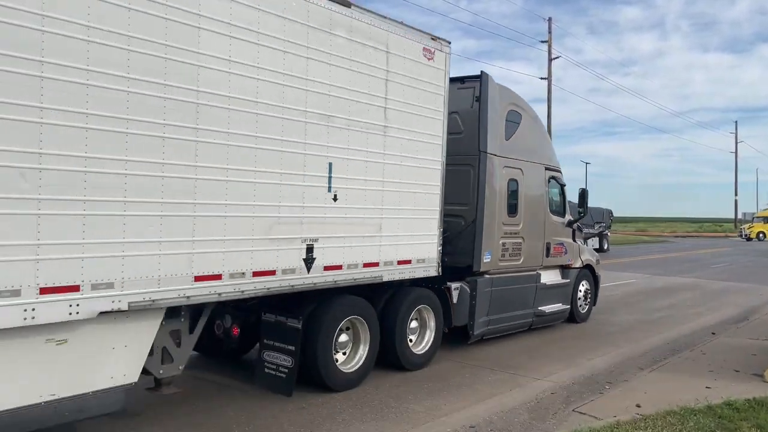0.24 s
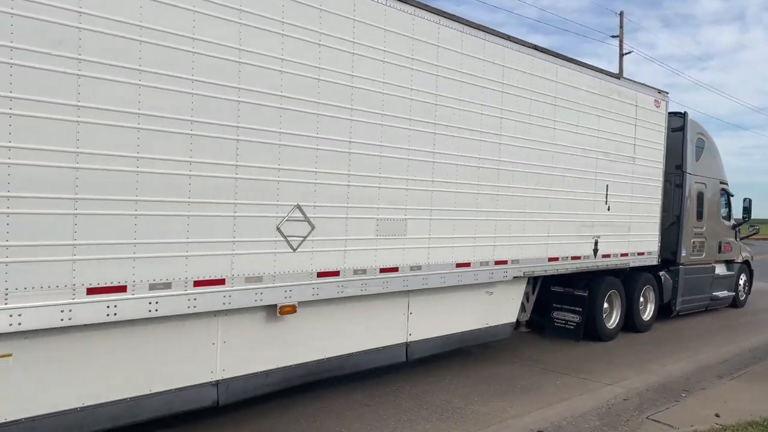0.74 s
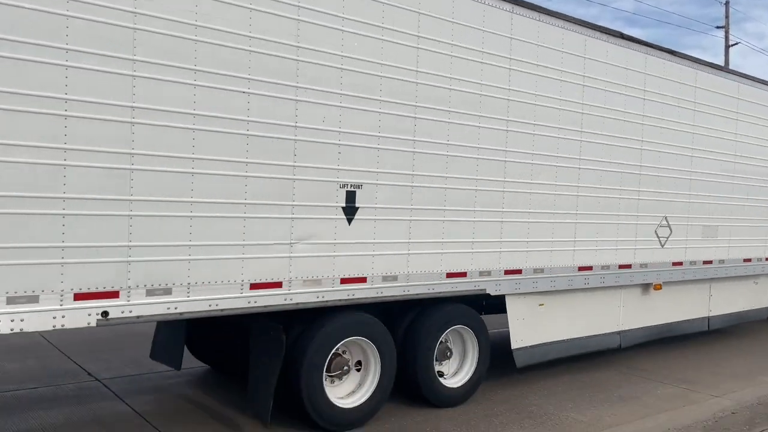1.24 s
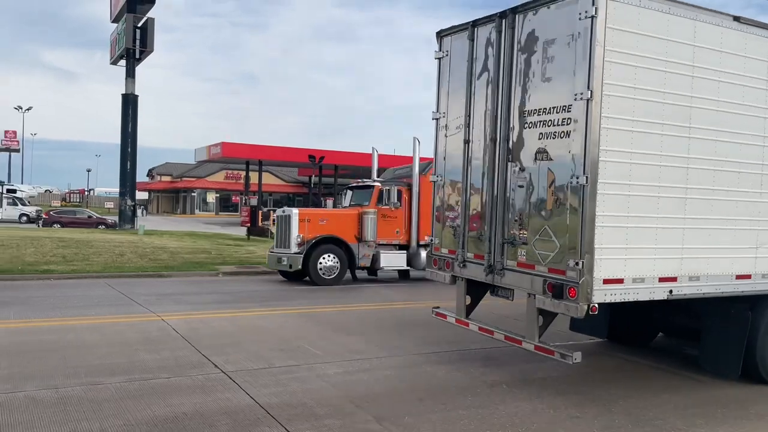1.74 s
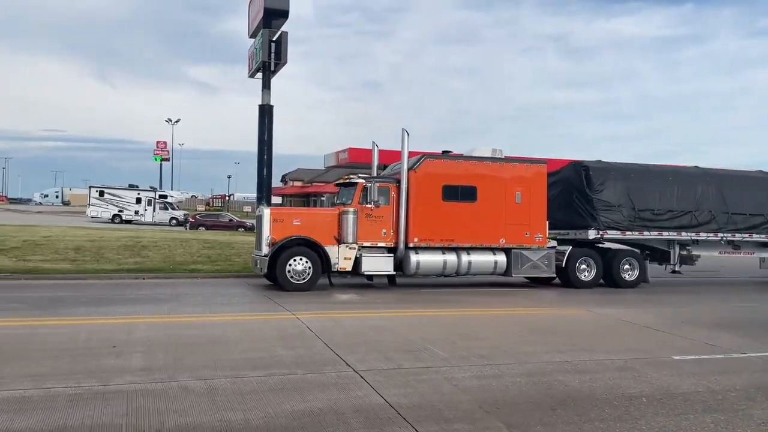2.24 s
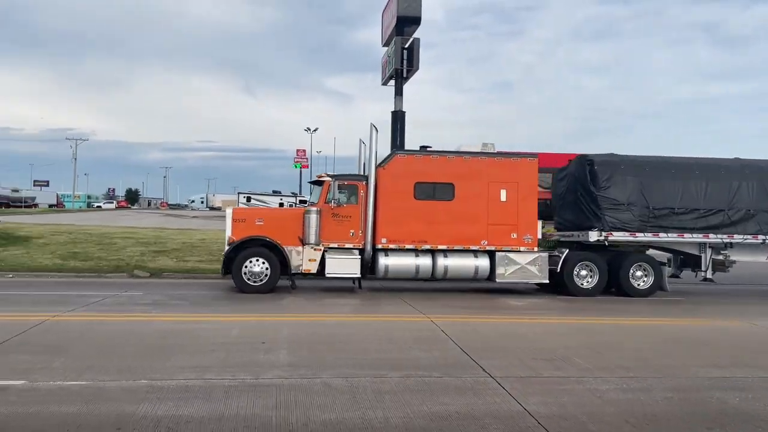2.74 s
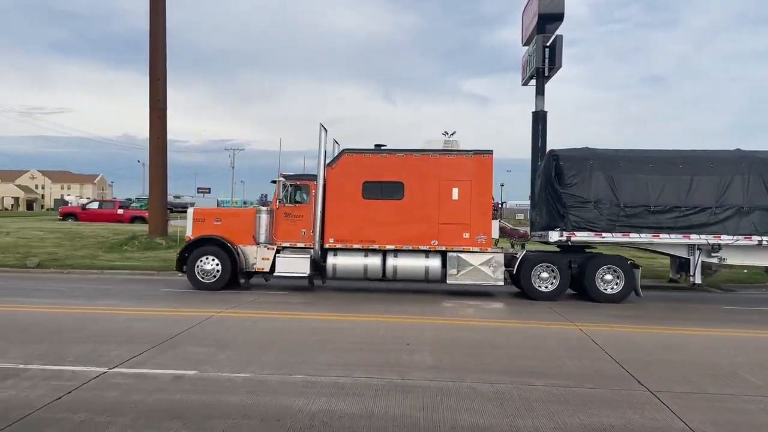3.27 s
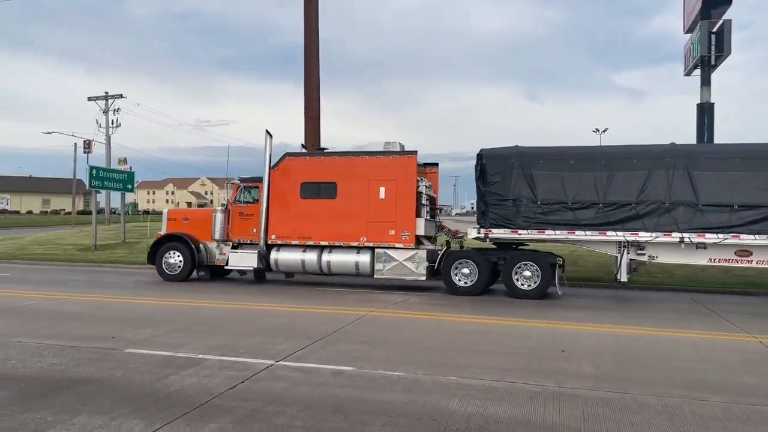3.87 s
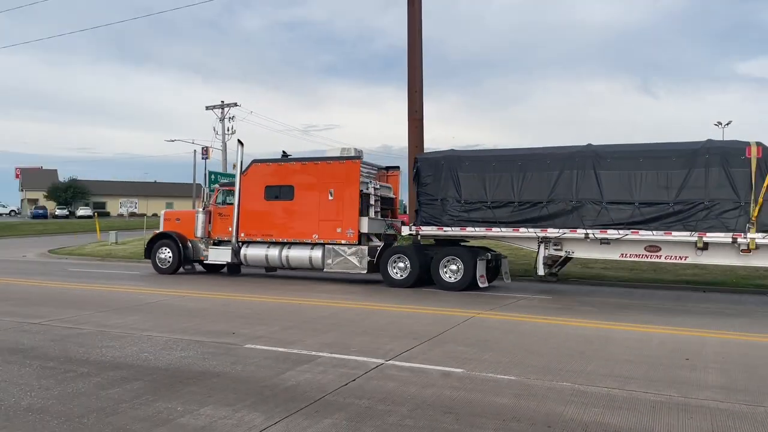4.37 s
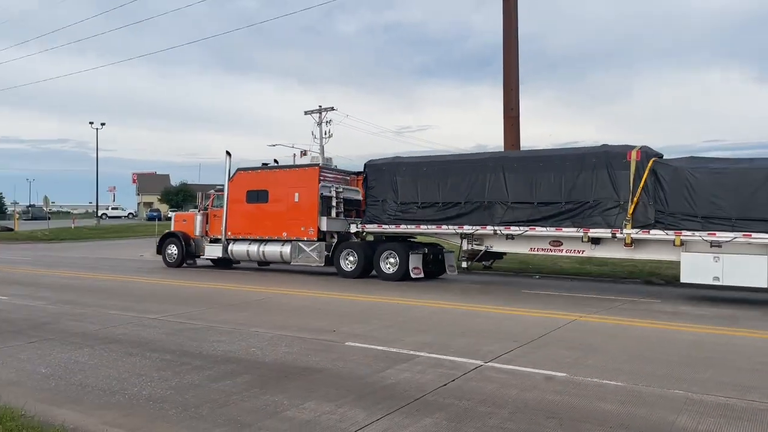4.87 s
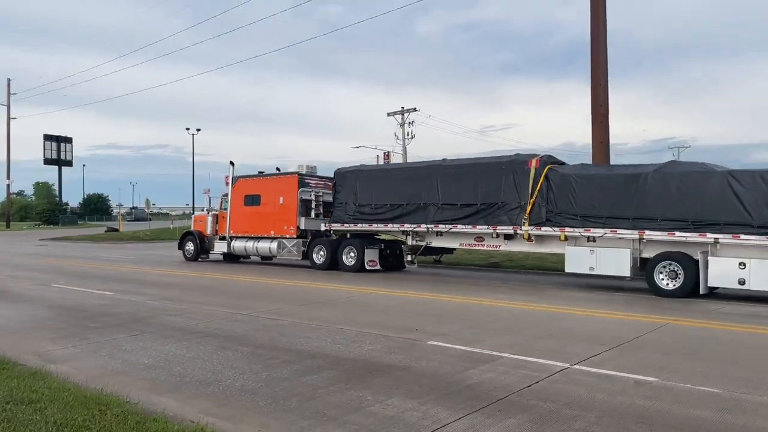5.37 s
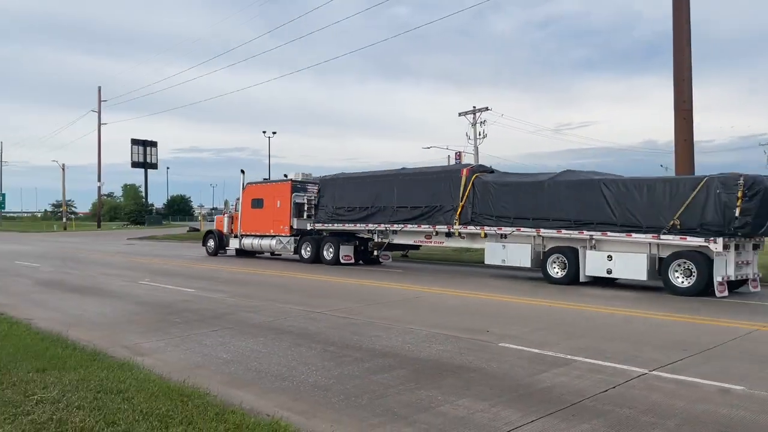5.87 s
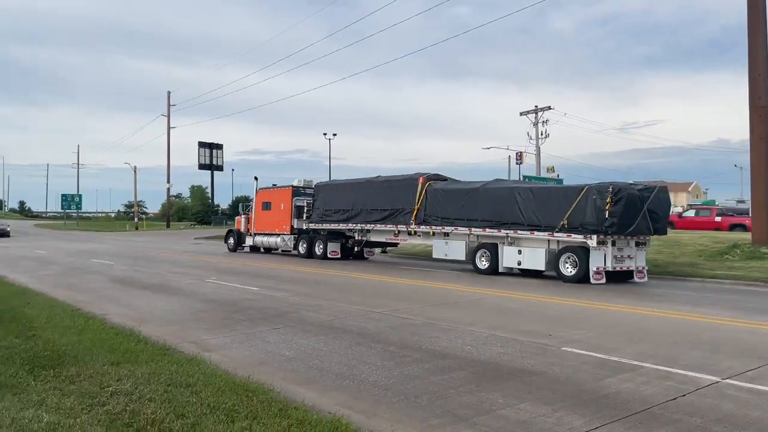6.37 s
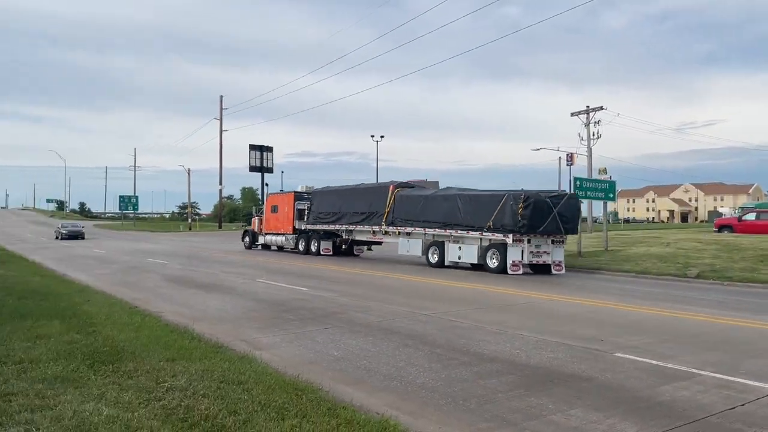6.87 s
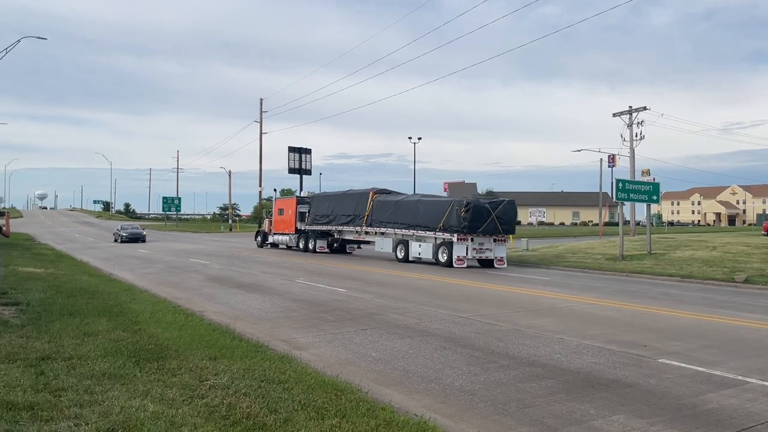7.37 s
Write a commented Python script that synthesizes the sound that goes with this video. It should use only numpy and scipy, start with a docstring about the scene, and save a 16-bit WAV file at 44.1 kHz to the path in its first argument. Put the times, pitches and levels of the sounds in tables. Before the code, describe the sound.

Close trailer rumble and tyre roar, a two-note truck horn tooting once and then blaring long, and a diesel engine pulling off across the highway.

```python
"""A semi-trailer rolls past at arm's length from the microphones, its box rumbling and tyres roaring as shaped noise.
Behind it a second diesel truck gathers speed across the highway, its exhaust a stack of rising tones.
It sounds two air trumpets, built from partials: a short toot behind the trailer, then a long blast in the open.
The exhaust drones on as it pulls away, and a delayed copy of the engine roar, the road's reflection,
sweeps slowly through the noise; near the end its trailer gives faint squeaks."""
import sys
import numpy as np
from scipy import signal
from scipy.fft import rfft, irfft, next_fast_len
from scipy.io import wavfile
from scipy.ndimage import uniform_filter1d, map_coordinates

SR = 44100
rng = np.random.default_rng(int(sys.argv[2]) if len(sys.argv) > 2 else 0)


def persist_wave(psi):
    """Save psi, clipped to +-1, as 16-bit WAV."""
    counts = np.round(np.clip(psi, -1, 1) * 32767).astype(np.int16)
    wavfile.write(sys.argv[1], SR, np.atleast_2d(counts).T)


N = 335601

# the long pull of the horn cord: start/s, end/s, attack of the high trumpet/s, release/s (doubled for the low one),
# level/dB, sag/dB per s, brassy edge/dB, low trumpet/dB, lag of the low trumpet/s, flutter/rad, sharp by/Hz
BLAST_PULL = (1.738, 3.325, 0.019, 0.023, 0, 4, -38.5, 0.5, 0.12, 0.16, 0)

HORN_HZ = 515.1  # the high trumpet once settled, before it sinks
SPEAK_S = 0.0052  # each partial of the blast speaks this much later than the one below
LOW_RISE_S = 0.22  # the low trumpet's fundamental builds slowly
BRASSIEST_S, BRASSY_HALF_S, BRASSY_DB = 2.27, 0.092, 2.5  # the overtones swell as the bells sweep past
EASE_S, EASE_DB_PER_S = 3.19, 15  # the cord is eased before it is let go


def amp(db):
    """Decibels to gain."""
    return 10 ** (np.asarray(db) / 20)


def unit(x):
    """Scale to rms 1."""
    return x / np.sqrt(np.mean(x ** 2) + 1e-20)


def along(points, hz):
    """Read (Hz, value) points on a log axis."""
    f, v = np.transpose(points)
    return np.interp(np.log(hz + 1), np.log(f + 1), v)


def clock():
    """The time of every sample in seconds."""
    return np.arange(N) / SR


def curves(rows):
    """One value per sample for each column after the time."""
    s, *cols = np.transpose(rows)
    return [np.interp(clock(), s, c) for c in cols]


def gate(rows, fade):
    """Open while a table lasts, with soft edges outside it."""
    opening = np.clip((clock() - rows[0][0]) / fade + 1, 0, 1)
    closing = np.clip((rows[-1][0] - clock()) / fade + 1, 0, 1)
    return opening * closing


def wobble(rate):
    """A smooth random curve, rate knots a second."""
    knots = rng.standard_normal(int(N * rate / SR) + 4)
    return map_coordinates(knots, [clock() * rate])


def turns(hz):
    """Running phase of a frequency curve."""
    return 2 * np.pi * np.cumsum(hz) / SR


def tone(phase):
    """A sine of rms 1 that starts anywhere in its cycle."""
    return np.sqrt(2) * np.sin(phase + rng.uniform(0, 2 * np.pi))


def bell(x, half):
    """A bell-shaped swell around zero."""
    return np.exp(-(x / half) ** 2 / 2)


def swell(s, half, db):
    """Gain of a bell-shaped rise or dip."""
    return amp(db * bell(clock() - s, half))


def envelope(start, end, attack, release):
    """Rise from start, hold until end, then die away."""
    t = clock()
    rise = 1 - np.exp(-np.maximum(t - start, 0) / attack)
    return rise * np.exp(-np.maximum(t - end, 0) / release)


def filtered(x, response):
    """x times a complex response of frequency."""
    m = next_fast_len(N + SR // 2)
    return irfft(rfft(x, m) * response(np.fft.rfftfreq(m, 1 / SR)), m)[..., :N]


def rush(spectrum, patchy_db, lead_us):
    """Stereo noise of rms 1 with patches of random gain, reaching the left port first."""
    # f/Hz, likeness of left and right (1 same, -1 opposite)
    alike = [(60, 0.95), (150, 0.96), (370, 0.94), (900, 0.64), (2230, 0.37), (5490, 0.67), (9800, -0.32),
             (13600, -0.7)]
    z = signal.stft(rng.standard_normal((2, N)), nperseg=1024)[2]
    field = uniform_filter1d(rng.standard_normal(z.shape[1:]), 4, 0)
    field = uniform_filter1d(field, 12, 1)
    pair = signal.istft(z * amp(patchy_db * unit(field)), nperseg=1024)[1][:, :N]

    def mid_side(hz):
        angle = np.arccos(np.clip(along(alike, hz), -1, 1)) / 2
        return amp(along(spectrum, hz)) * [np.cos(angle), np.sin(angle)]

    def lead(hz):
        return np.exp(np.outer([1j, -1j], np.pi * hz * lead_us / 10 ** 6))

    mid, side = filtered(pair, mid_side)
    return unit(filtered(np.array([mid + side, mid - side]), lead))


def near_trailer():
    """The box booms and rumbles, the tread roars and sings, and the axles thump over joints in the concrete."""
    # the pass at arm's length, before each layer's trim: t/s, rumble level/dB, tyre roar level/dB
    near = [(0, -18.5, -27), (.5, -19, -30), (1.05, -18.5, -32.5), (1.42, -26, -35), (1.6, -19, -31.5),
            (1.78, -16.5, -28), (1.83, -30, -41.5), (2.3, -43, -40), (3.2, -49, -51)]
    # noise colours before scaling to rms 1: f/Hz, density/dB per Hz
    rumble_colour = [(24, -39), (34, -26), (43, -10.5), (60, 1), (100, -5), (160, -7.5), (240, -17.5),
                     (400, -51), (900, -76.5)]
    tyre_colour = [(120, -13.5), (250, 2), (480, .5), (620, -3.5), (870, 0.5), (1100, 0), (1500, -7),
                   (1900, -8.5), (2600, -25.5), (4500, -24), (9000, -70)]
    hiss_colour = [(800, -15.5), (2000, 8), (2700, 1.5), (4000, -2), (5500, -4.5), (7000, -9),
                   (9500, -18.5), (12000, -12.5), (14000, -27)]
    # tyres thump over slab joints: t/s, level/dB
    joints = [(0.423, -4.5), (0.481, -6), (1.62, -10), (1.691, -9.5)]
    # ringing modes of a struck tyre: f/Hz, level/dB, t60/s
    tyre_modes = [(81, -6.5, 0.28), (106.5, -3.5, 0.32), (172, -14, 0.15)]
    rumble_db, roar_db = curves(near)
    rumble = amp(rumble_db - 1.5) * rush(rumble_colour, patchy_db=-1.0, lead_us=5)
    boom = amp(rumble_db - 3.5 + 1.95 * wobble(9.95)) * tone(turns(47 + 4 * wobble(20)))
    roar = amp(roar_db + 5.5) * rush(tyre_colour, patchy_db=2, lead_us=10)
    # hiss over the roar grows in dB per s as the tyres are heard from behind
    hiss = amp(roar_db - 5.5 + 0.5 * clock()) * rush(hiss_colour, patchy_db=2.5, lead_us=27)
    tread = amp(roar_db - 4.0 + 3.9 * wobble(14.0)) * tone(turns(478 + 20 * wobble(45)))
    thumps = np.zeros(N)
    t = np.arange(SR // 2) / SR
    for s, db in joints:
        ring = sum(amp(db + level - 60 * t / t60) * np.sin(2 * np.pi * hz * t)
                   for hz, level, t60 in tyre_modes)
        thumps[round(s * SR):][:len(t)] += ring * (1 - np.exp(-t / 0.013))
    return (rumble + boom + roar + hiss + tread) * gate(near, fade=0.31) + thumps


def whine(s, half, hz, glide, width_hz, db):
    """A narrow gliding band of noise under a bell-shaped swell."""
    t = clock() - s
    phase = turns(hz + glide * t)
    band = wobble(width_hz) * np.cos(phase) + wobble(width_hz) * np.sin(phase)
    return amp(db + 1.8 * wobble(14)) * bell(t, half) * band


def whines():
    """Narrow bands of tyre and driveline noise swell, glide and fade."""
    # t at the top/s, half length/s, f/Hz, glide/Hz per s, width/Hz, level/dB
    whine_rows = [(0.106, 0.45, 875, -43.5, 159.8, -27.5), (3.801, 0.37, 401, -1.5, 29, -37.5),
                  (3.952, 0.35, 892, 140, 71, -44), (3.983, 0.11, 1816, 97.5, 220, -46),
                  (4.398, 0.53, 2033, 59, 107, -48), (5.503, 0.64, 729, 190, 85, -42.5),
                  (5.506, 0.5, 1195, 278, 150, -50), (5.497, 0.28, 1994, 0.5, 120, -46),
                  (6.03, 0.091, 2980, 1, 220, -51), (3.505, 0.14, 2035, 0, 80, -47.5),
                  (3.95, 0.47, 282.6, -8, 12.8, -41), (4.148, 0.31, 1717, 2, 93, -47.5),
                  (5.3, .22, 378, 3, 15.7, -44), (6.68, 0.15, 1915, 0.5, 174, -51),
                  (7.2, 0.2, 1984, -0.5, 94, -55), (7.3, .25, 2850, -1, 180, -60)]
    return sum(whine(*row) for row in whine_rows)


def exhaust(firing, firing_hz):
    """Six cylinders fire into the stacks: four tones and weaker crankshaft orders."""
    # loudness of the firing tones: t/s, level/dB
    exhaust_levels = [(1.3, -26.5), (1.72, -18.5), (1.88, -26), (2.3, -25.5), (3.3, -33), (4.6, -31.5),
                      (5.85, -34.5), (7.15, -29), (7.6, -33)]
    # each multiple of the firing rate: relative level/dB
    firing_tones_db = [1, -2, -4, -15]
    # peaks and notches that the rising tones sweep through: f/Hz, half width/Hz, gain/dB
    exhaust_colour = [(112.2, .5, -8), (114, .6, 4), (124.5, 1.8, 3), (134, 2, -3), (142.5, 2.6, 9),
                      (177.5, 1.2, -8), (186, .9, -12), (201, 3, 3), (210.3, 1.8, -18), (261, 12, -10)]
    # unequal cylinders add tones between the firing multiples: crankshaft order, relative level/dB
    crank = [(4, -47.5), (5, -45.5), (7, -46), (8, -49), (10, -59.5), (11, -60.5), (13, -51.5)]
    smear_radians = 0.697  # the muffler holds back the higher tones and smears each puff
    level_db, = curves(exhaust_levels)

    def colour(f):
        return sum(db * bell(f - hz, half) for hz, half, db in exhaust_colour)

    note = np.zeros(N)
    for k, db in enumerate(firing_tones_db, 1):
        tone_db = level_db + db + colour(k * firing_hz) + 0.74 * wobble(13) + 1.0 * wobble(55)
        note += amp(tone_db) * np.sqrt(2) * np.cos(k * firing - smear_radians * k * k)
    # three firings to each turn of the crankshaft
    uneven = sum(amp(db + 3 * wobble(5)) * tone(order * firing / 3) for order, db in crank)
    return (note + amp(-1.5) * uneven) * gate(exhaust_levels, fade=0.43) * amp([[.25], [-.25]])


def far_truck():
    """Engine roar and injector clatter pulse with the firings; the roar arrives once more off the road."""
    # the engine gathers speed: t/s, firing rate f/Hz
    firing_rate = [(1.3, 56), (2.3, 58.3), (4.7, 64.7), (5.5, 67.2), (7, 70.4), (7.6, 72.3)]
    # engine roar from across the highway, before its trim: t/s, level/dB
    far = [(1.6, -39), (3.5, -41.5), (3.75, -43.5), (3.98, -40.5), (4.95, -42.5), (5.3, -41), (6.1, -42),
           (7.55, -44.5)]
    # noise colours before scaling to rms 1: f/Hz, density/dB per Hz
    roar_colour = [(26, -30), (37, -4.5), (48, 7), (110, 3.5), (220, 3), (400, 5), (650, -4), (900, -3),
                   (1200, -8), (1600, -9), (2000, -7.5), (2600, -26), (5000, -68)]
    clatter_colour = [(900, -26), (1750, -11), (2030, 7), (2600, -4), (3200, 3.5), (4000, 3), (4900, -7.5),
                      (6200, -3.5), (7500, -23), (10000, -15), (12500, -22), (14000, -44.5)]
    # strength of the road's reflection: t/s, share of the dulled roar
    bounce = [(3.5, 0.4), (4.1, 0.28), (6.6, 0.51), (7.6, 0.69)]
    clatter_mean_db, clatter_swing = -45.5, 1.6  # at the mean roar; it swings wider than the roar
    screened_s, screen_db_per_s = 6.66, 6  # from then on its own trailer hides the clatter
    abeam_s, pass_s = 3.22, 1  # the reflection is latest when the truck is abeam
    far_ms, abeam_ms = 1.116, 2.72  # its delay far off and abeam

    firing_hz, = curves(firing_rate)
    firing = turns(firing_hz * (1 + .0015 * wobble(20)))
    beat = np.cos(firing)
    roar_db, = curves(far)
    roar = amp(roar_db + 7) * unit(rush(roar_colour, patchy_db=1.0, lead_us=31) * amp(1.8 * beat))
    clatter_db = clatter_mean_db + clatter_swing * (roar_db - np.mean(far, axis=0)[1])
    clatter_db = clatter_db - screen_db_per_s * np.maximum(clock() - screened_s, 0)
    pulse = amp(0.96 * beat + 1.2 * wobble(130))
    clatter = amp(clatter_db) * unit(rush(clatter_colour, patchy_db=2.3, lead_us=39) * pulse)
    share, = curves(bounce)
    delay_ms = far_ms + (abeam_ms - far_ms) / (1 + ((clock() - abeam_s) / pass_s) ** 2)
    late = clock() - delay_ms / 1000
    # the rough road mirrors only the longer waves
    dull = filtered(roar, lambda hz: 1 / (1 + (hz / 1000) ** 4))
    mirrored = share * np.array([np.interp(late, clock(), side) for side in dull])
    return (roar + clatter + mirrored) * gate(far, fade=0.26) + exhaust(firing, firing_hz)


def reeds(pull):
    """Running phases of both reeds: each pull starts sharp, settles, then sinks as the truck goes by."""
    # the pitch of the toot wavers: t/s, half length/s, shift/Hz
    scoops = [(1.178, .012, -7), (1.215, .012, -5), (1.32, .025, -6)]
    sink_hz_per_s, sharp_hz, settle_s = 4.8, 4.5, .06
    low_ratio = .6421  # low reed to high reed
    age = np.maximum(clock() - pull[0], 0)
    hz = HORN_HZ + pull[-1] - sink_hz_per_s * age + sharp_hz * np.exp(-age / settle_s)
    hz = hz + sum(dip * bell(clock() - s, half) for s, half, dip in scoops)
    high = turns(hz * (1 + 0.000682 * wobble(60)))
    return high, low_ratio * high + 0.19 * wobble(50)


def mirrored_gain(hz):
    """Direct sound and reflections add and cancel, so each partial swells and fades at moments of its own."""
    # trailers, road and buildings mirror the blast along paths that change as the truck moves:
    # share, delay in mid-blast/ms, drift/ms per s
    mirrors = [(.584, 1.376, 1.297), (.26, 6.958, -3.782), (.516, 8.16, 1.412), (.527, 8.368, .769),
               (.496, 9.666, 1.241), (.601, 25.771, -.522)]
    t = clock() - 2.5  # seconds from mid-blast
    reflections = sum(share * np.exp(-2j * np.pi * hz * (ms + drift * t) / 1000)
                      for share, ms, drift in mirrors)
    return np.abs(1 + reflections)


def flares():
    """Gain of the brief flares and dips shared by the high trumpet's strong partials and the low fundamental."""
    # t/s, half length/s, gain/dB
    flare_rows = [(1.177, 0.01, 8), (1.198, 0.013, -4.5), (1.264, 0.029, 3.5), (1.285, 0.0076, -7),
                  (2.22, 0.018, -3.5), (2.608, 0.039, -4.5)]
    return np.prod([swell(*row) for row in flare_rows], axis=0)


def partial_flares(k):
    """Gain of the flares and dips that partial k of the high trumpet has alone."""
    # t/s, half length/s, multiple, gain/dB
    single_flares = [(1.147, .014, 1, -3), (1.181, .012, 1, 2), (1.27, .015, 1, 1), (2.2, 0.029, 2, -9),
                     (2.57, .015, 2, -10), (1.144, .014, 3, 6), (1.176, 0.011, 3, -15),
                     (1.45, 0.044, 3, 17), (1.177, .015, 4, -7), (1.303, 0.027, 4, 8),
                     (2.18, .025, 4, -10.5), (2.54, 0.068, 4, -2), (2.666, .02, 4, -4),
                     (2.676, .03, 4, 5.5), (2.785, 0.017, 4, -17), (3.15, 0.016, 4, -12),
                     (1.167, .015, 5, 6), (1.25, 0.037, 5, 14), (1.8, 0.014, 5, 11), (1.82, .025, 6, 9.5),
                     (2.02, 0.043, 6, 6), (2.25, 0.043, 6, 3), (2.55, 0.068, 6, 4.5), (1.897, .05, 8, 6.5),
                     (1.89, .04, 9, -3), (2.48, 0.033, 9, 12)]
    return np.prod([swell(s, half, db) for s, half, multiple, db in single_flares
                    if round(multiple) == k], axis=0)


def high_trumpet(pull, high, low, in_open):
    """Strong partials and a brassy edge that the low reed shakes; in the open they surge and meet reflections."""
    # four strong partials: level/dB, extra sag/dB per s, surge at the start of the blast/dB,
    # level from behind the trailer/dB, lag in the toot/s
    partials = [(-18, 2, 12, 0, 0.023), (-17, 3.2, -14, -2, 0), (-23, 0, 6, -5.5, 0.0053),
                (-32, -2, 11.5, -4, 0.0029)]
    # the third partial through the blast: t/s, level/dB
    third_partial = [(1.79, 5), (1.89, 6.5), (1.98, 3), (2.05, 5.5), (2.2, -9.5), (2.28, 3), (2.34, 8.5),
                     (2.44, 1.5), (2.6, 2), (2.72, 4.5), (2.88, 0), (3, -2.5), (3.13, 4), (3.3, -2.5)]
    # overtones of the brassy edge: f/Hz, relative level/dB
    high_tones = [(2560, -8), (3070, -2), (3580, -3), (4100, -7), (4600, -6), (5100, -25), (5600, -22.5),
                  (6150, -13.5)]
    surge_at_s, surge_s = 0.037, 0.014  # time after the pull and half length
    start, end, attack, release, level_db, sag, edge_db, _, lag, flutter, _ = pull
    age = np.maximum(clock() - start, 0)

    def speak(delay):
        return envelope(start + delay, end, attack, release)

    body = np.zeros(N)
    for step, (db, extra_sag, surge_db, screened_db, screened_lag) in enumerate(partials):
        k = step + 1
        if in_open:
            # 512 Hz stands for the fundamental in the reflections
            fading = amp(curves(third_partial)[0]) if k == 3 else mirrored_gain(k * 512) ** 0.94
            surge = swell(start + surge_at_s + step * SPEAK_S, surge_s, surge_db)
            path = fading * speak(step * SPEAK_S) * surge
        else:
            path = amp(screened_db) * speak(screened_lag)
        level = amp(db - extra_sag * age + 0.62 * k * wobble(16))
        body += level * path * partial_flares(k) * tone(k * high + flutter * wobble(55))

    shake = .6 * envelope(start + lag, end, LOW_RISE_S, release) * np.sin(low)
    # reed jitter counts for more the higher the overtone, so the top blurs into hiss
    jitter = .022 * wobble(400)
    edge = np.zeros(N)
    for k in range(5, 13):
        level = amp(edge_db + along(high_tones, k * HORN_HZ) + 4.4 * wobble(22.03))
        phase = k * (high + jitter) + shake + (flutter + .12) * wobble(70)
        edge += level * partial_flares(k) * tone(phase)
    edge = edge * speak(len(partials) * SPEAK_S) * swell(BRASSIEST_S, BRASSY_HALF_S, BRASSY_DB)
    eased = amp(-EASE_DB_PER_S * np.maximum(clock() - EASE_S, 0))
    return amp(level_db - sag * age) * (body * flares() + edge) * eased


def low_trumpet(pull, high, low, in_open):
    """The long trumpet speaks late; its overtones and the sum tones of both reeds have a rise of their own."""
    # its fundamental through the blast: t/s, relative level/dB
    low_root = [(1.9, 5.5), (1.98, 5.5), (2.12, -8.5), (2.23, 3), (2.32, -3), (2.5, -6), (2.58, -14.5),
                (2.65, 0.5), (2.74, 2.5), (2.98, -2), (3.12, 1), (3.3, -5.5)]
    # its overtones: multiple, relative level/dB
    low_tones = [(2, -2), (3, -3.5), (4, -5), (5, -9.5), (6, -13.5), (7, -19), (8, -33), (9, -23.5),
                 (11, -18), (12, -39), (14, -22)]
    # the trumpets share one air line and breed sum tones: high multiple, low multiple, relative level/dB
    sum_tones = [(1, 1, -14.5), (1, 2, -51), (1, 3, -19), (2, -1, -25), (2, 1, -10.5), (2, 2, -12.5),
                 (2, 3, -6.5), (2, 4, -18.5), (3, 1, -40.5), (4, 3, -23), (4, 5, -19.5), (6, 3, -22)]
    root_db, edge_db, edge_rise_s = -18.5, -26.5, 0.094
    start, end, _, release, level_db, sag, _, low_db, lag, *_ = pull
    age = np.maximum(clock() - start, 0)

    def partial(phase, db):
        return amp(db + 2.2 * wobble(8.32)) * tone(phase + 0.066 * wobble(90))

    root = amp(root_db + (curves(low_root)[0] if in_open else 0)) * tone(low)
    root = root * flares() * amp(-EASE_DB_PER_S * np.maximum(clock() - EASE_S, 0))
    root = root * envelope(start + lag, end, LOW_RISE_S, 2 * release)
    edge = sum(partial(round(k) * low, db) for k, db in low_tones)
    mixed = sum(partial(round(j) * high + round(k) * low, db) for j, k, db in sum_tones)
    # squaring the envelope softens the onset
    bright = amp(edge_db) * envelope(start + lag, end, edge_rise_s, 2 * release) ** 2
    bright = bright * swell(BRASSIEST_S, BRASSY_HALF_S, BRASSY_DB)
    return amp(level_db + low_db - sag * age) * (root + bright * (edge + mixed))


def horn():
    """Two reed trumpets on one air line; the toot is scattered by the moving trailer that screens it."""
    # the short pull of the cord, columns as in BLAST_PULL
    toot_pull = (1.093, 1.32, 0.064, 0.14, 10.5, 69, -43.5, 2, .15, 0.35, 4.5)
    sound = np.zeros(N)
    for pull, in_open in (toot_pull, False), (BLAST_PULL, True):
        high, low = reeds(pull)
        sound += high_trumpet(pull, high, low, in_open) + low_trumpet(pull, high, low, in_open)
    # the path off the receding trailer wall arrives lower in pitch
    high, low = reeds(toot_pull)
    glance = high_trumpet(toot_pull, .972 * high, low, False)
    return sound + amp(-10) * glance


def yard(x):
    """Trailers and buildings answer with a tail of decaying noise, each band dying at its own pace."""
    # f/Hz, t60/s
    decay = [(200, 0.6), (1000, 0.72), (4000, 0.97), (10000, 0.14)]
    hz, t, z = signal.stft(rng.standard_normal((2, SR)), SR, nperseg=256)
    tail = signal.istft(z * amp(-60 * t / along(decay, hz)[:, None]), SR, nperseg=256)[1]
    late = np.pad(x, (900, 0))  # samples before the first answer
    return signal.fftconvolve(late[None], tail / np.linalg.norm(tail[0]), axes=1)[:, :N]


def horn_air():
    """Air rushes through the bells for as long as the blast lasts."""
    # noise colour before scaling to rms 1: f/Hz, density/dB per Hz
    air_colour = [(300, -10), (900, 0), (2000, 3), (2700, -5), (4000, 5), (7000, -6), (9500, -14),
                  (12500, -9.5), (14000, -23.5)]
    air = rush(air_colour, patchy_db=1.5, lead_us=35)
    start, end, attack, release, *_ = BLAST_PULL
    return amp(-43.5) * air * envelope(start, end, attack, release)


def squeaks():
    """Something on the departing trailer squeaks in short blips of unsteady tone."""
    # t/s, f/Hz, level/dB
    squeak_rows = [(7.175, 2900, -52), (7.2, 3800, -52), (7.342, 2850, -54), (7.369, 3830, -44.5)]
    half_s = 0.0032  # half length of each
    return sum(amp(db) * bell(clock() - s, half_s) * tone(2 * np.pi * hz * clock() + .5 * wobble(250))
               for s, hz, db in squeak_rows)


def scene():
    """Both trucks, and the horn as it reaches the two microphone ports."""
    # the horn at the ports: f/Hz, left over right/dB, phase by which left leads/rad
    horn_ports = np.array([(330, .4, 0), (512, .1, .2), (657, 4, .1), (1330, 3.3, .1), (1540, 4.8, -.8),
                           (1850, 2, 0), (2050, -3.3, 1.1), (2560, 3.8, 1), (3600, .2, .8),
                           (4620, -1.4, .8), (9000, 0, 1.6)])

    def ports(hz):
        log_gain = np.log(amp(along(horn_ports[:, :2], hz)))
        phase = along(horn_ports[:, ::2], hz)
        return np.exp(np.outer([.5, -.5], log_gain + 1j * phase))

    traffic = near_trailer() + whines() + far_truck() + squeaks()
    call = horn()
    heard = filtered(call, ports) + amp(-19.0) * yard(call) + horn_air()
    return heard + traffic * amp([[.2], [-.2]])


def record(dry):
    """The phone rounds off the highest peaks and keeps nothing above its band limit."""
    held = dry / (1 + np.abs(dry / .95) ** 8) ** (1 / 8)
    return filtered(held, lambda hz: hz < 14150)


dry = scene()
out = record(dry)
persist_wave(out)
```